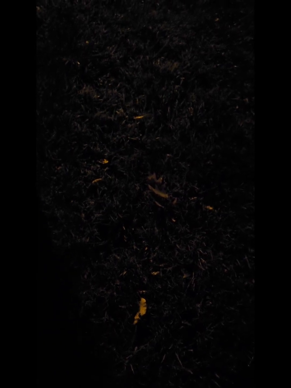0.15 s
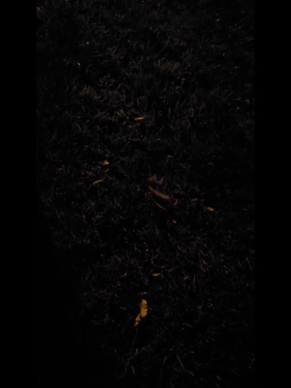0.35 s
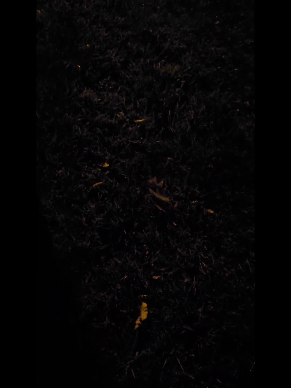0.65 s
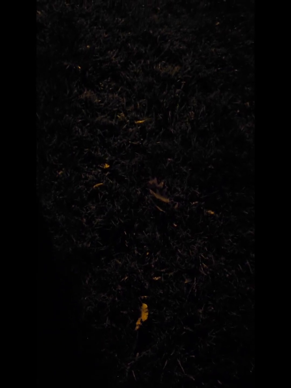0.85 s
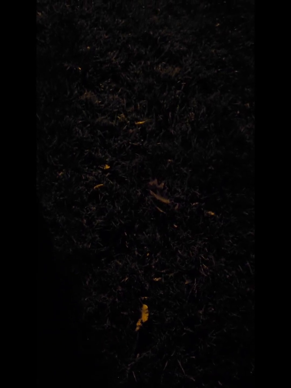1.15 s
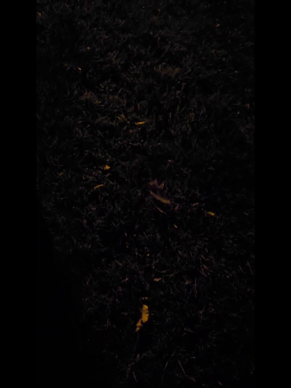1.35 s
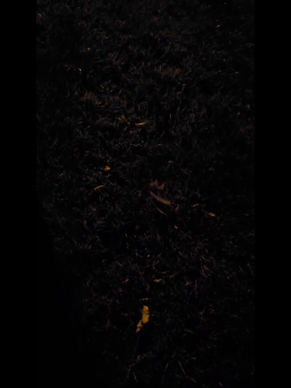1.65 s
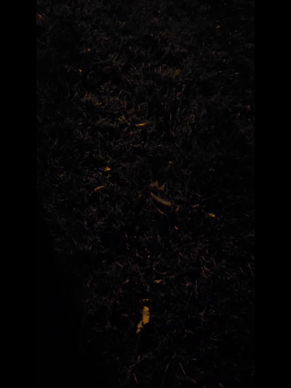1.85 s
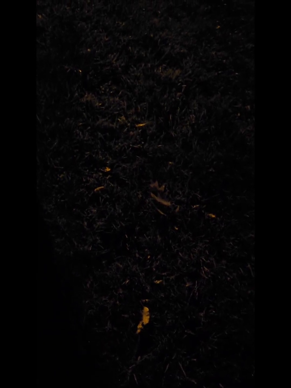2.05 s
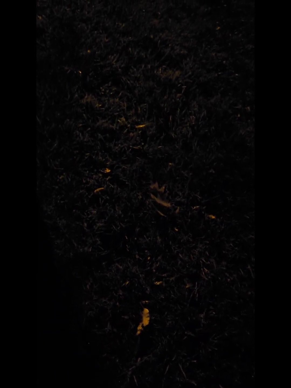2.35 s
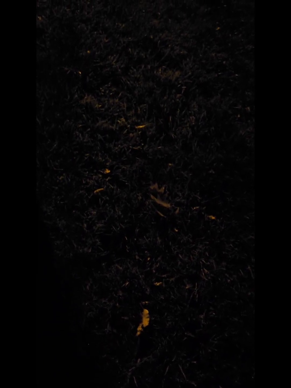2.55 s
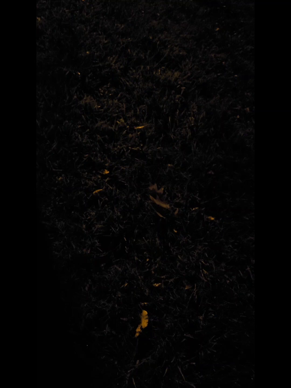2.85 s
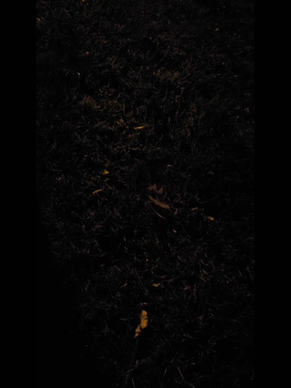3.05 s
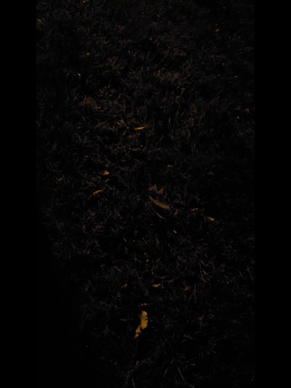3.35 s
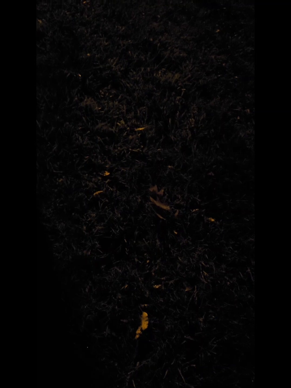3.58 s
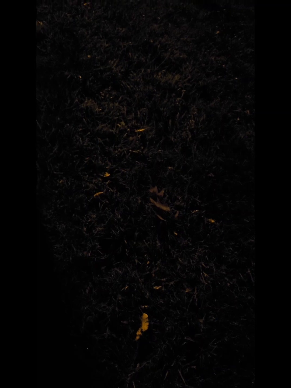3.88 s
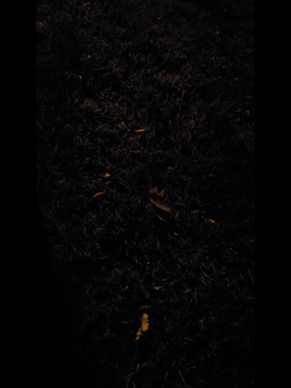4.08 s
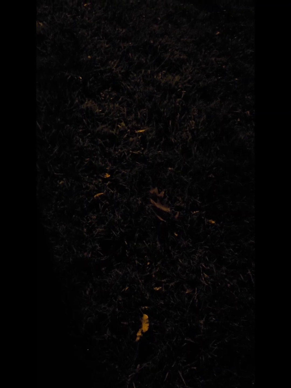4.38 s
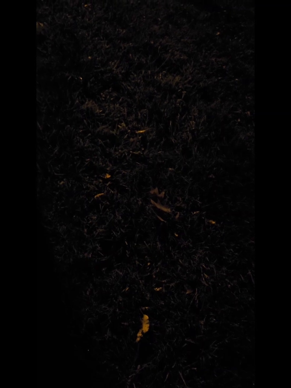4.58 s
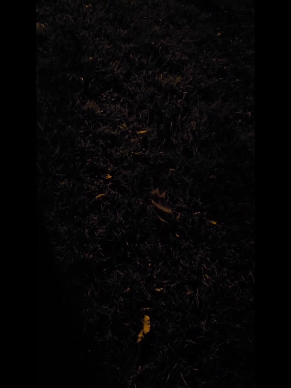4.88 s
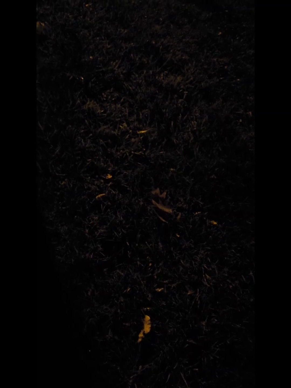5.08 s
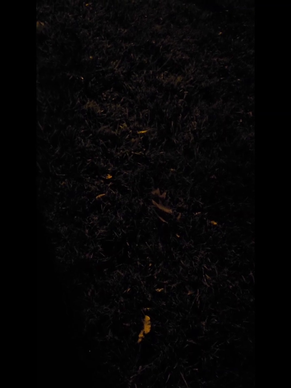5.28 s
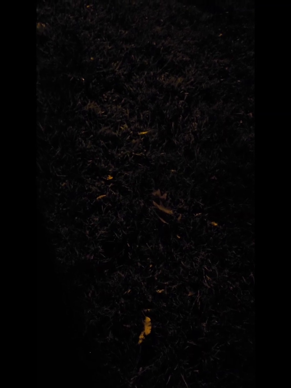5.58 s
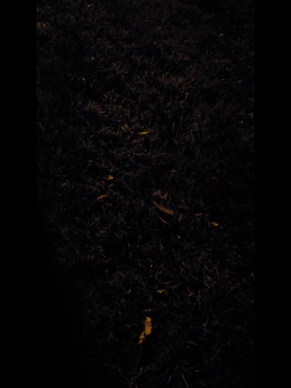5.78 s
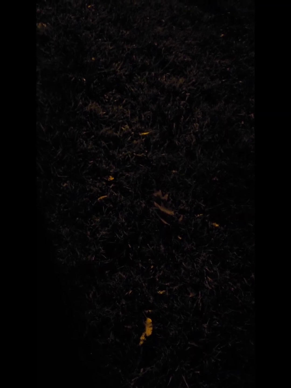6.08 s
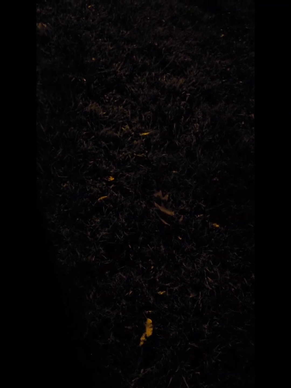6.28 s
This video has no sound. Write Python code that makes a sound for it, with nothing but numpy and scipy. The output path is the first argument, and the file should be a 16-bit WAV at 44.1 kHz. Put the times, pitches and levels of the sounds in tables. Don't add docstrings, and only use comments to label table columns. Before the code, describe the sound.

Night meadow: one near cricket shrills, pauses and resumes, while distant crickets chirp, a faint frog croaks and wind rumbles unevenly.

```python
import sys
import numpy as np
from scipy import signal
from scipy.fft import rfft, irfft, next_fast_len
from scipy.io import wavfile
from scipy.ndimage import uniform_filter1d, map_coordinates

SR = 44100
rng = np.random.default_rng(int(sys.argv[2]) if len(sys.argv) > 2 else 0)


def level_to_linear(level):
    exponent = np.asarray(level, float) / 20
    return 10 ** exponent


def to_wav(sig):
    pcm = np.clip(np.atleast_2d(sig), -1, 1) * 32767
    pcm = np.round(pcm).astype(np.int16)
    wavfile.write(sys.argv[1], SR, pcm.T)


N = 283563


def unit(x):
    return x / np.sqrt(np.mean(x ** 2) + 1e-20)


def along(points, hz):
    f, value = np.transpose(points)
    return np.interp(np.log(hz + 1), np.log(f + 1), value)


def curves(rows):
    s, *columns = np.transpose(rows)
    return [np.interp(np.arange(N) / SR, s, column) for column in columns]


def wobble(rate):
    knots = rng.standard_normal(int(N * rate / SR) + 4)
    return map_coordinates(knots, [np.arange(N) * rate / SR])


def filtered(x, response):
    m = next_fast_len(N + SR // 2)
    return irfft(rfft(x, m) * response(np.fft.rfftfreq(m, 1 / SR)), m)[..., :N]


def noise_like(curve):
    return unit(filtered(rng.standard_normal((2, N)), lambda f: level_to_linear(along(curve, f))))


def resonances(modes):
    def response(f):
        return sum((-1) ** k * level_to_linear(db) * 1j * f * width / (hz * hz - f * f + 1j * f * width)
                   for k, (hz, width, db) in enumerate(modes))
    return response


def sides(db):
    return level_to_linear(np.array([db / 2, -db / 2]))


def bursts(events, shape):
    t = np.arange(-SR // 8, SR // 8) / SR
    marks = np.zeros(N)
    for s, db in events:
        marks[round(s * SR)] = level_to_linear(db)
    return signal.oaconvolve(marks, shape(t), "same")


def scatter(x, t60, wet_db):
    t = np.arange(SR // 10) / SR
    tail = rng.standard_normal((2, 2, len(t))) * level_to_linear(-60 * t / t60) * (t > .001)
    tail *= level_to_linear(wet_db) / np.linalg.norm(tail, axis=2, keepdims=True)
    a, b = signal.fftconvolve(x.reshape(1, -1, N), tail, axes=2)[..., :N]
    sway = 1.5 * wobble(2.5)
    return x + np.cos(sway) * a + np.sin(sway) * b


def wings(s, db, hz, length, glide_hz, rough, skew=.97):
    half = SR // 100
    t = np.arange(-half, half) / SR
    luck = rng.standard_normal((len(s), 6))
    span = length * np.exp(0.054 * luck[:, :1])
    progress = np.clip(t / span + .47, 0, 1)
    flutter_hz = 260 + 60 * luck[:, 5:]
    flutter = np.clip(luck[:, 1:2], -1.6, 1.6) * np.sin(2 * np.pi * flutter_hz * t + 3 * luck[:, 2:3])
    shape = abs(np.sin(np.pi * progress ** skew))
    swell = shape ** .9 * level_to_linear(db[:, None] + 9 * rough * flutter)
    sag = np.clip(t, 0, 1) ** 4 / length ** 3
    slope = glide_hz / length * (1 + .18 * luck[:, 3:4])
    cycles = hz[:, None] * t - slope * t * t / 2 - 240 * sag
    phase = 2 * np.pi * cycles + rough * flutter + 9 * luck[:, 4:5]
    at = np.clip(np.round(s * SR).astype(int)[:, None] + np.arange(len(t)) - half, 0, N)

    def lay(rows):
        return np.bincount(at.ravel(), rows.ravel(), N + 1)[:N]

    def play(multiple, lead=0):
        if multiple == 0:
            return lay(swell)
        narrowing = shape ** abs(.22 * (multiple - 1))
        return lay(swell * narrowing * np.sin(multiple * phase + lead))
    return play


# (time [s], strength [dB], left-right difference [dB])
WIND = [(0, -36, -7), (.12, -33.5, 6), (.36, -43.5, -2.5), (.6, -41, 9), (.95, -43.5, 9), (1.5, -50.5, -2),
        (1.75, -55.5, -1), (2.02, -49.5, 10), (2.75, -48, 9), (3.3, -43, -4), (3.55, -38.5, -1),
        (4, -55, 3.5), (4.5, -43.5, 10.5), (5.1, -59, 1.5), (5.6, -52, 1.5), (5.9, -47.5, 1), (6.1, -53, 1),
        (6.4, -46, 6)]
# (frequency [Hz], density [dB per Hz])
BUFFET = [(12, -61), (30, -20), (44, -5.5), (58, -1.5), (80, -7.5), (120, -19), (200, -49), (400, -120)]
# (frequency [Hz], density [dB per Hz])
FLAP = [(60, -71), (100, -7.5), (130, 4), (180, -14.5), (260, -7.5), (400, -34), (800, -51)]
# (time [s], level [dB])
FLAPS = [
    (.12, -42),
    (.54, -42.5),
    (.74, -43.5),
    (2.76, -58),
    (2.99, -52),
    (3.22, -45.5),
    (4.5, -75),
    (5.48, -52),
]


def wind():
    level_db, lean_db = curves(WIND)
    low, high = noise_like(BUFFET), noise_like(FLAP)
    swells = level_to_linear(3 * np.array([wobble(4.93), wobble(4.74)]))
    lumps = level_to_linear(1.64 * np.array([wobble(9), wobble(7.3)]))
    sharp = level_to_linear(-53 + 0.71 * (level_db + 46))
    sharp = sharp + bursts(FLAPS, lambda t: np.exp(-(t / 0.038) ** 2))
    port_lean_db = -2
    steady = level_to_linear(level_db + 4.0) * swells * low
    return sides(lean_db + port_lean_db) * (steady + sharp * unit(lumps * high))


# (frequency [Hz], density [dB per Hz])
NIGHT = [(88, -13), (160, -3.5), (300, -11.5), (1600, -25.5), (2500, -29.5), (3100, -25), (3500, -37.5),
         (4600, -25), (5300, -27.5), (5900, -14), (6350, -35), (6700, -34), (7700, -31), (8900, -47),
         (15700, -46.5)]
# (frequency [Hz], width [Hz], level [dB])
CHORUS = [(2140, 80, 2), (2460, 70, 3), (2635, 50, -2), (15550, 700, 6.5)]
# (frequency [Hz], correlation [-1..1])
ALIKE = [(130, 1), (300, 1), (650, 0.26), (1400, -0.011), (3000, -0.029), (7000, -0.24), (15000, 0.019)]
# (frequency [Hz], left-right difference [dB])
LEAN = [(200, -1), (1300, 0), (2400, -8.5), (4400, 1.5), (8000, 1.5), (15000, 12)]


def night_air():
    z = signal.stft(rng.standard_normal((2, N)), nperseg=512)[2]
    patches = uniform_filter1d(rng.standard_normal(z.shape[1:]), 6, 0)
    patches = uniform_filter1d(patches, 14, 1)
    pair = signal.istft(z * level_to_linear(0.52 * unit(patches)), nperseg=512)[1][:, :N]

    def mid_side(f):
        turn = np.arccos(np.clip(along(ALIKE, f), -1, 1)) / 2
        colour = level_to_linear(along(NIGHT, f)) * (1 + 2.0 * abs(resonances(CHORUS)(f)))
        return colour * [np.cos(turn), np.sin(turn)]

    mid, side = filtered(pair, mid_side)
    ports = np.array([mid + side, mid - side])
    return level_to_linear(-53.5) * unit(filtered(ports, lambda f: sides(along(LEAN, f))))


# (time [s], level [dB])
HUM = [(0, -66), (.11, -46.5), (.3, -55), (4.28, -61.5), (4.4, -54), (5.02, -49.5), (5.15, -65),
       (6.43, -73)]


def far_hum():
    t = np.arange(N) / SR
    return level_to_linear(curves(HUM)[0] - 6.0) * np.sin(2 * np.pi * 300 * t + 1.36 * wobble(20))


def trill(rate, hz, length, glide_hz, lean_db, wet_db, pauses):
    luck = rng.random((int(N / SR * rate * 1.03), 4))
    gaps = .97 + 0.07 * luck[:, 0] + 0.5 * (luck[:, 1] < pauses)
    s = np.cumsum(gaps / rate)
    drift = wobble(4)[np.minimum(s * SR, N - 1).astype(int)]
    pitch = hz * (.996 + .008 * luck[:, 3] + .012 * drift)
    voice = wings(s, 5 * luck[:, 2], pitch, length, glide_hz, rough=.16)
    return unit(scatter(voice(1), 0.2, wet_db)) * sides(lean_db)[:, None]


# (time [s], level [dB])
HEDGE = [(0, -56.5), (.51, -58), (.8, -63), (1.08, -63), (1.29, -55.5), (1.37, -65), (1.43, -82),
         (1.54, -56), (1.8, -60.5), (2.83, -57), (3.6, -59), (3.9, -59.5), (4.37, -57.5), (5, -62),
         (5.6, -59), (6.1, -64), (6.43, -57.5)]


def hedge_trills():
    pair = trill(62, 5960, .0125, glide_hz=380, lean_db=.3, wet_db=-1, pauses=.06)
    pair += level_to_linear(-8.5) * trill(50, 5560, 0.021, glide_hz=402, lean_db=-14, wet_db=4.0, pauses=0.23)
    return level_to_linear(curves(HEDGE)[0]) * unit(pair)


# (time [s], level [dB])
TREE = [(0, -65), (.95, -64.5), (1.05, -63.5), (1.8, -73), (1.9, -63), (2.4, -69), (2.6, -62.5),
        (4.3, -67.5), (4.4, -67), (6.43, -67)]


def tree_cricket():
    t = np.arange(N) / SR
    beat = 1 + 1.4 * np.cos(2 * np.pi * 76.0 * t + 0.47 * wobble(38.0))
    purr = beat * np.sin(2 * np.pi * 3075 * t + 0.7 * wobble(14))
    opposed = [[1], [-1]]
    return level_to_linear(curves(TREE)[0]) * unit(scatter(purr, 0.082, wet_db=-7.5)) * opposed


# (time [s], level [dB])
NEIGHBOUR = [(0, -76), (1.7, -76), (3.6, -64), (5.6, -64), (6.43, -63)]


def neighbour_cricket():
    voice = trill(52, 4930, .013, glide_hz=650, lean_db=5, wet_db=0, pauses=.2)
    return level_to_linear(curves(NEIGHBOUR)[0]) * voice


# (first stroke [s], last stroke [s], first level [dB],
# last level [dB])
RUNS = [
    (0.0217, 0.076, -33.5, -33.5),
    (0.1107, 0.1476, -32.5, -35),
    (0.174, 0.2115, -31, -33),
    (0.2336, 0.2677, -33.5, -33.5),
    (0.2997, 0.3325, -32.5, -32.5),
    (0.3603, 0.465, -33.5, -33),
    (0.498, 0.5876, -33.5, -32.5),
    (0.617, 0.6682, -31.5, -32.5),
    (0.6985, 0.868, -33, -33),
    (0.894, 0.9497, -31, -33.5),
        (1.632, 1.653, -35.5, -35.5), (1.773, 1.8086, -43, -35.5), (1.8346, 1.871, -36.5, -34.5),
          (1.8996, 1.934, -36, -32), (1.963, 1.9806, -34, -34), (2.008, 2.0416, -34, -32.5),
          (2.0667, 2.1006, -32, -35), (2.1297, 2.2, -33.5, -32.5), (2.224, 2.241, -32.5, -33),
          (2.273, 2.327, -32, -32.5), (2.3516, 2.406, -35, -32.5), (2.429, 2.4643, -30.5, -32),
          (2.4923, 2.543, -33.5, -32), (2.5703, 2.6056, -31.5, -34.5), (2.6324, 2.6843, -32, -34),
          (2.711, 2.747, -31.5, -32.5), (2.7744, 2.79, -30, -33), (2.8133, 2.8285, -31.5, -35),
          (2.8544, 2.8755, -35.5, -32.5), (2.893, 2.982, -31.5, -35.5), (3.008, 3.061, -32, -34.5),
          (3.095, 3.134, -32, -34.5), (3.17, 3.2248, -32, -32), (3.251, 3.35, -31, -33.5),
          (3.379, 3.433, -32, -33), (3.4687, 3.5247, -31, -33.5), (3.5506, 3.622, -33, -34.5),
          (3.655, 3.6917, -31, -34), (3.726, 3.7604, -32, -32),
        (3.9051, 3.9266, -36.5, -34.5), (3.9433, 3.9593, -37.5, -40), (3.9795, 3.9793, -33.5, -40),
           (4.0046, 4.036, -32, -35), (4.0617, 4.1131, -32, -33), (4.1416, 4.177, -31.5, -36),
           (4.2067, 4.2757, -33.5, -34.5), (4.305, 4.3186, -32.5, -38.5), (4.339, 4.373, -34, -33),
           (4.399, 4.436, -36, -35), (4.458, 4.4758, -35.5, -35), (4.5053, 4.6111, -33, -36.5),
           (4.636, 4.661, -40, -39.5), (4.681, 4.7173, -36.5, -34.5), (4.8675, 4.8677, -37.5, -41),
           (4.8892, 4.9047, -35.5, -38), (4.935, 4.951, -36, -37.5), (4.982, 5.0689, -36, -34),
           (5.101, 5.1163, -32, -36), (5.1428, 5.161, -38, -33), (5.2524, 5.2849, -35.5, -34),
           (5.3144, 5.349, -34.5, -34.5), (5.373, 5.4433, -33, -34.5), (5.4729, 5.5064, -30.5, -34),
           (5.536, 5.5711, -32, -34.5), (5.5996, 5.6336, -30, -35)]


def strokes():
    spacing_s, uneven_s, uneven_db = .018, .0006, 1.3
    runs = []
    for first, last, first_db, last_db in RUNS:
        count = 1 + round((last - first) / spacing_s)
        runs.append(np.linspace((first, first_db), (last, last_db), count))
    rows = np.vstack(runs)
    return (rows + rng.standard_normal(rows.shape) * (uneven_s, uneven_db)).T


# (multiple, level [dB], left-right difference [dB], left lead [rad])
OVERTONES = [
    (1, -0.5, 1, -1.0),
    (2, -22, 0, 4),
    (3, -17, 13.5, 1.5),
]
# (frequency [Hz], level [dB])
SCRAPE = [(3500, -15), (4200, -1), (5500, 11.5), (7000, -2), (9000, -6.5), (10800, -7), (11900, -1),
          (12900, -13), (15800, 3.5)]
# (frequency [Hz], level [dB])
RADIATES = [(4000, 3), (4600, -1), (11000, -1), (13000, -26), (14200, -3.5), (15500, 6.5)]


def near_cricket():
    s, db = strokes()
    tired = np.clip(-32.5 - db, 0, 8)
    hz = 4826.0 + 9 * (db + 30.0) - 1.0 * tired ** 2 + rng.normal(0, 22, len(s))
    length = (.0122 - .0005 * tired)[:, None]
    voice = wings(s, db, hz, length, glide_hz=445, rough=.17)
    tones = np.zeros((2, N))
    for multiple, level_db, lean_db, lead in OVERTONES:
        pair = np.array([voice(multiple, lead / 2), voice(multiple, -lead / 2)])
        tones += level_to_linear(level_db) * sides(lean_db)[:, None] * pair
    tones = filtered(tones, lambda f: level_to_linear(along(RADIATES, f)))

    def scrape_colour(f):
        shading = sides(np.interp(f, [10000, 15000], [0, 12]))
        return level_to_linear(along(SCRAPE, f)) * shading

    scrape = unit(filtered(rng.standard_normal((2, N)), scrape_colour))
    return scatter(tones + level_to_linear(-13.5) * voice(0) * scrape, t60=0.14, wet_db=-10)


# (time [s], level [dB])
CROAKS = [(.088, -61), (.263, -60.5), (.983, -63), (1.179, -62.5), (1.975, -65.5), (2.131, -61),
          (2.782, -63.5), (2.961, -61.5), (3.604, -60.5), (3.789, -64), (4.473, -62.5), (4.65, -62.5),
          (5.394, -63), (5.558, -63), (6.321, -64.5)]
# (frequency [Hz], width [Hz], level [dB])
THROAT = [
    (1777, 166, 12.5),
    (2076, 144, 16.5),
    (2470, 303, 12),
]


def frog():
    swell = bursts(CROAKS, lambda t: np.exp(-(t / 0.059) ** 2))
    pulse_hz = 150 * level_to_linear(1.5 * wobble(40))
    pulses = np.diff(np.floor(np.cumsum(pulse_hz) / SR), prepend=0)
    pulses = pulses * level_to_linear(3.3 * wobble(220))
    source = unit(pulses) + 1.4 * rng.standard_normal(N)
    voice = unit(filtered(source, lambda f: resonances(THROAT)(f) * f / (f + 7500.0)))
    return scatter(swell * voice, .12, wet_db=-3) * sides(-6.5)[:, None]


# (time [s], peak level [dB], pitch [Hz], left-right difference [dB])
THUMPS = [(0.119, -16.5, 68, 15), (0.168, -21.5, 78, -14), (0.53, -28, 112, 2), (0.589, -19.5, 102, 17),
          (0.704, -27.5, 83, 18), (0.78, -22.5, 101, 22), (0.95, -25, 70.5, 11), (1.075, -46, 72, 19),
          (1.397, -33.5, 80, 1), (1.611, -32.5, 81, 18), (1.805, -40, 104.7, -4), (2.029, -28, 83.55, 21),
          (2.145, -35, 90, 10), (2.232, -30.5, 88, 17), (2.448, -34, 93, 14), (2.523, -35, 91, 13),
          (2.661, -29, 86, 18), (2.774, -26.5, 118, 22), (2.986, -22, 157, 22), (3.067, -26, 95, 11),
          (3.18, -22.5, 119, 22), (3.482, -30.5, 78, -11), (4.108, -35, 96.95, 8), (4.14, -32, 84.4, 18),
          (4.302, -34, 75.4, 18), (4.406, -33, 91, 13), (4.441, -27, 81.5, 15), (4.484, -30, 89.6, 18),
          (4.713, -32, 73.6, -17), (5.268, -48, 86, 8), (5.652, -39, 72, -6), (5.933, -34, 66, 10),
          (5.961, -40, 65, 11), (5.995, -35, 92, 18), (6.128, -36, 87, 5), (6.344, -33, 70, -9),
          (6.386, -30, 80, 13)]


def thumps():
    s, db, hz, lean_db = np.transpose(THUMPS)[..., None]
    t = np.arange(-SR // 25, SR // 25) / SR
    turn = 2 * np.pi * rng.random((len(s), 1))
    swell = np.exp(-(t * hz / .42) ** 2)
    push = level_to_linear(db) * swell * np.sin(2 * np.pi * hz * t + turn)
    at = np.clip(np.round((s + t) * SR).astype(int), 0, N).ravel()
    gains = level_to_linear(np.minimum(lean_db, 0)), level_to_linear(np.minimum(-lean_db, 0))
    return np.array([np.bincount(at, (push * g).ravel(), N + 1)[:N] for g in gains])


def chirper(chirps, hz, rate, lean_db, octave_db):
    s, db = np.transpose(chirps)
    k = np.arange(8)
    luck = rng.standard_normal((len(s), 2))
    times = (s[:, None] + (k - 3.9) / rate * (1 + .03 * luck[:, :1])).ravel()
    contour_db = 7.0 - 8 * np.exp(-k / 0.36) - 3 * np.exp((k - 7) / 1.1)
    sizes = (db[:, None] + contour_db).ravel() + rng.normal(0, 1.5, times.size)
    climb = hz - 190 * np.exp(-k / 1.4)
    pitch = (climb + 25 * luck[:, 1:]).ravel() + rng.normal(0, 30, times.size)
    voice = wings(times, sizes, pitch, .0095, glide_hz=260, rough=.16)
    octave = level_to_linear(octave_db) * voice(1.92) * sides(12)[:, None]
    return scatter(voice(0.97) * sides(lean_db)[:, None] + octave, 0.071, wet_db=-0.5)


# (centre time [s], level [dB])
LOW_CHIRPS = [(.26, -62.5), (.585, -62), (.93, -61), (1.298, -65.5), (1.683, -66), (1.986, -61),
              (2.291, -61), (2.606, -61), (2.946, -59.5), (3.243, -63), (3.533, -62), (3.81, -66.5),
              (4.13, -63), (4.463, -64), (4.759, -65), (5.09, -64.5), (5.412, -64.5), (5.772, -65),
              (6.08, -63.5), (6.39, -64)]
HIGH_CHIRPS = [(.15, -71), (.49, -69), (.82, -71), (1.165, -71), (1.496, -69.5), (1.83, -71), (2.13, -70),
               (2.43, -70), (2.73, -70), (3.02, -69), (3.3, -71), (3.62, -68), (3.89, -68), (4.18, -74),
               (4.46, -68.5), (4.77, -70), (5.04, -70), (5.33, -71), (5.63, -72), (5.96, -70.5), (6.3, -72)]


def ground_crickets():
    lower = chirper(LOW_CHIRPS, hz=8040, rate=86, lean_db=2.5, octave_db=-26)
    higher = chirper(HIGH_CHIRPS, hz=8230, rate=92, lean_db=10, octave_db=-9)
    return lower + higher


# (time [s], peak level [dB])
TICKS = [
    (0.9856, -46),
    (1.0564, -55),
    (1.0794, -60),
    (1.1223, -56),
    (1.1558, -59),
    (4.8648, -76),
    (5.2675, -66),
    (5.7244, -61),
    (6.1944, -75),
]


def grass():
    def tick(t):
        return level_to_linear(-3.0 - 60 * abs(t - .001) / np.where(t > 0, .03, .006))

    hiss = filtered(rng.standard_normal((2, N)), lambda f: f * f / (f * f + 4000 ** 2))
    return bursts(TICKS, tick) * unit(hiss)


def peep():
    t = np.arange(N) / SR
    swell = np.exp(-((t - 6.095) / 0.034) ** 2)
    return level_to_linear(-66) * swell * np.sin(2 * np.pi * 3310 * t) * sides(6)[:, None]


def scene():
    air = wind() + night_air() + far_hum()
    far_singers = hedge_trills() + tree_cricket() + neighbour_cricket()
    return air + far_singers + near_cricket() + frog() + thumps() + ground_crickets() + grass() + peep()


def low_pass(x):
    return signal.sosfilt(signal.butter(12, 15790, fs=SR, output="sos"), x)


def record(dry):
    mix = filtered(dry, lambda f: f < 15790)
    return low_pass(mix)


dry = scene()
out = record(dry)
to_wav(out)
```